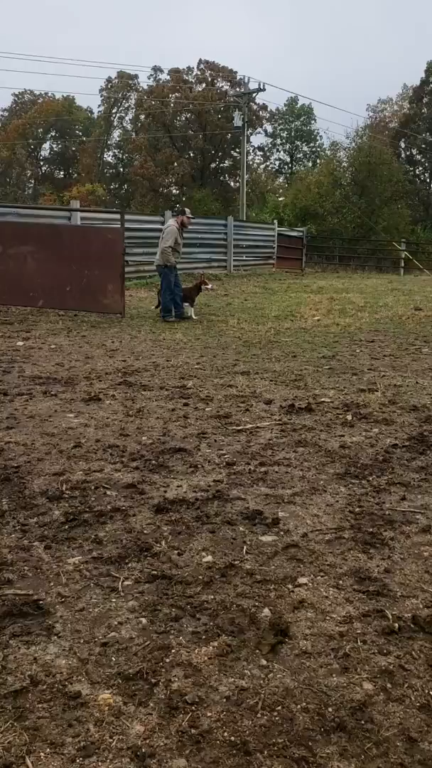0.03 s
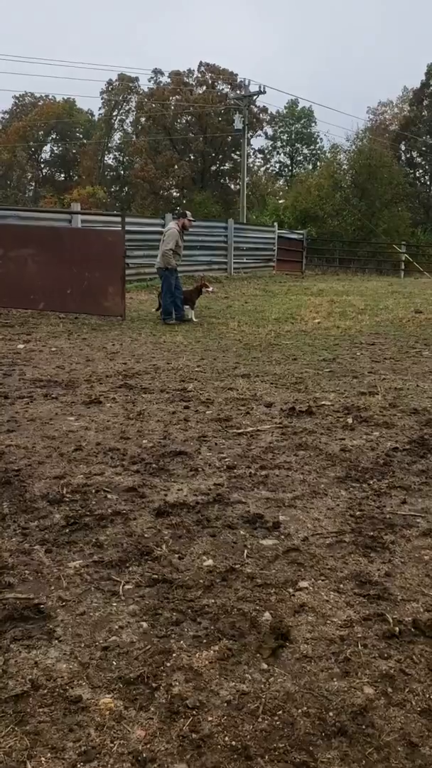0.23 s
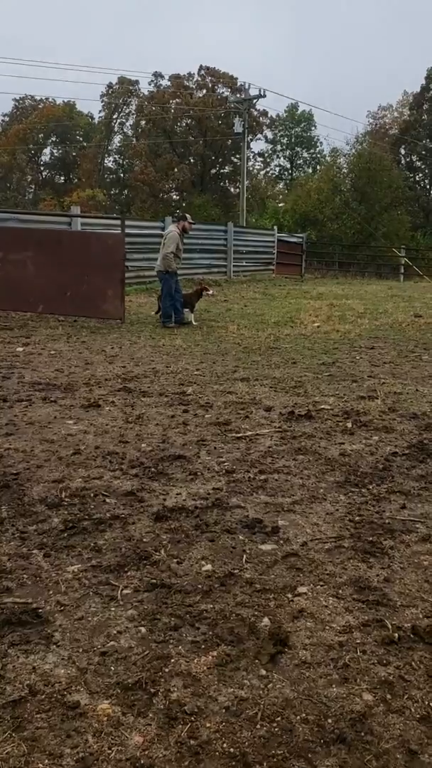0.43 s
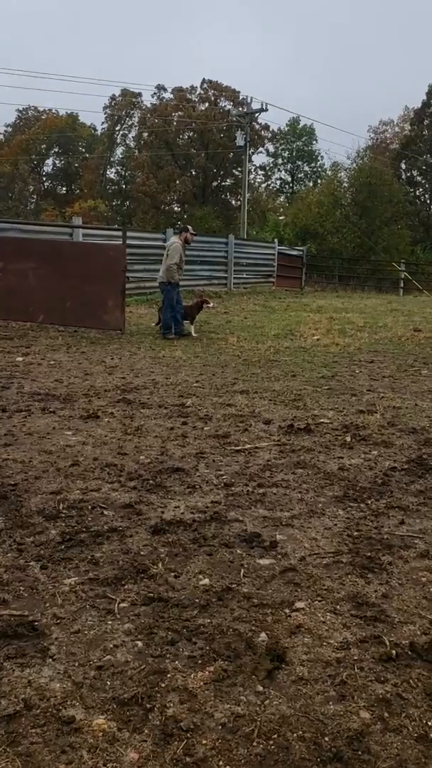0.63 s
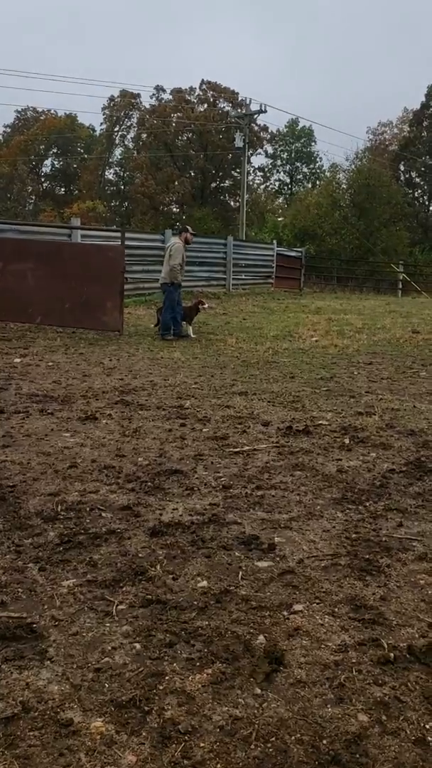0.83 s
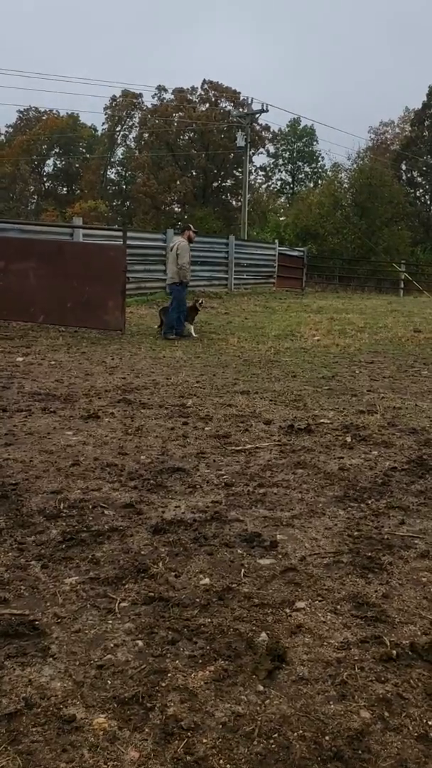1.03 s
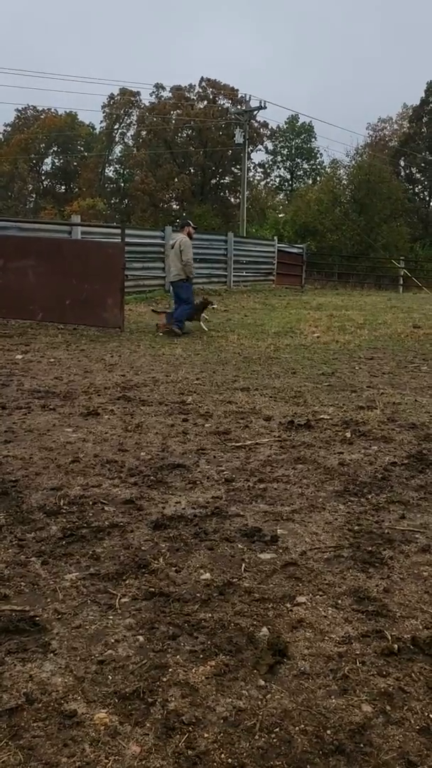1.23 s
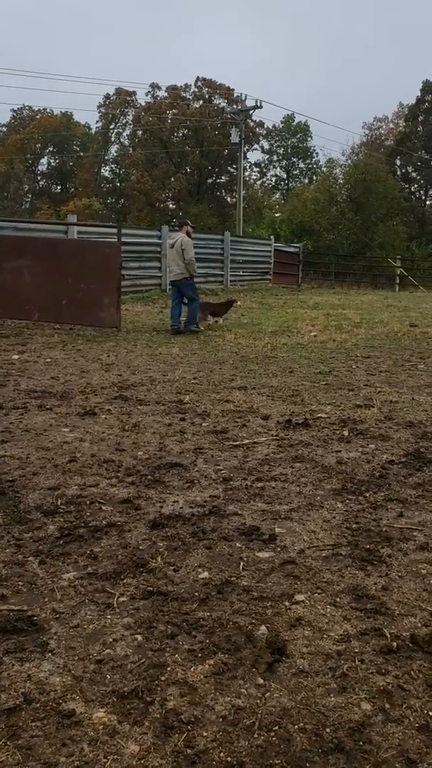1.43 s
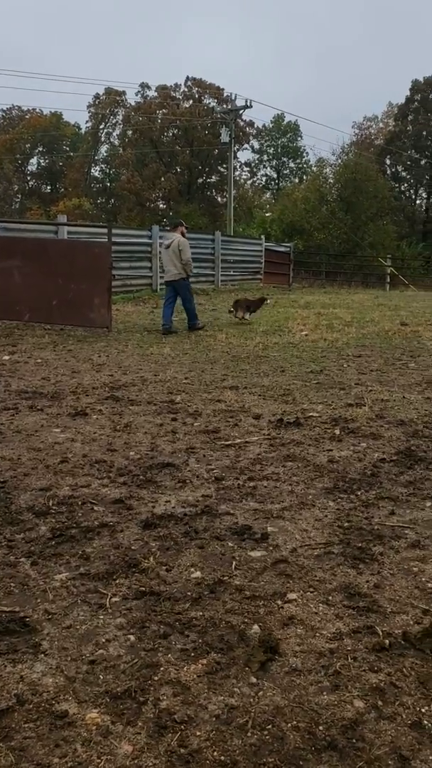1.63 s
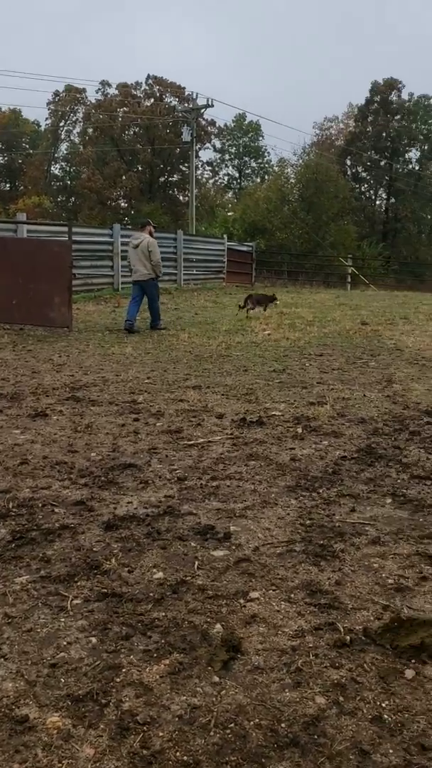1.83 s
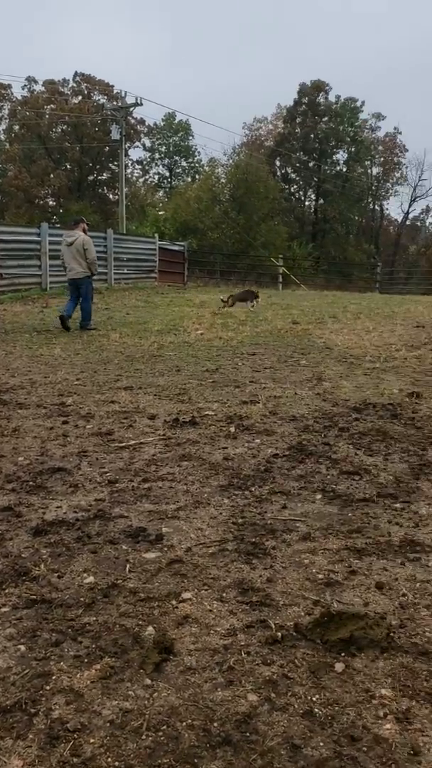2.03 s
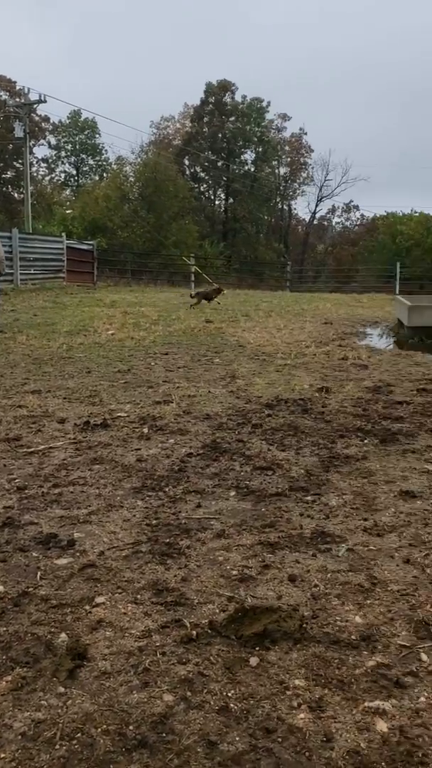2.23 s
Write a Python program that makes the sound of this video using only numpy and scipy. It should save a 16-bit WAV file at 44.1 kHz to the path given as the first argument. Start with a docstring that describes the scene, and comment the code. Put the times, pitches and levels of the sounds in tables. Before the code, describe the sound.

One cow moos outdoors in a farmyard, climbing from a muffled hum to a strained, nasal call before falling away. Beneath it are a faint echo, soft boot scuffs on dirt and a light wind rumble on the microphone.

```python
"""A cow on a farm lot hums low with its mouth shut, swells into one open, rising moo and drops it
with a rasp. Its vocal pulses ring in throat and nose, roughened by breath and brassy at full strain.
Fences and trees answer faintly. Insects hiss far off, a boot scuffs the dirt,
and light wind and a rustling sleeve touch the two microphone ports."""
import sys
import numpy as np
from scipy import signal
from scipy.fft import rfft, irfft, next_fast_len
from scipy.io import wavfile
from scipy.ndimage import map_coordinates

SR = 44100
rng = np.random.default_rng(int(sys.argv[2]) if len(sys.argv) > 2 else 0)


def unload_audio(sound):
    """Save the sound as a 16-bit wav file, at the path given as the first command line argument."""
    columns = np.transpose(np.atleast_2d(sound))
    # keep every value between -1 and 1, then stretch to whole-number steps
    steps = np.round(np.clip(columns, -1, 1) * 32767)
    wavfile.write(sys.argv[1], SR, steps.astype(np.int16))


N = 100856


def amp(db):
    return 10 ** (np.asarray(db) / 20)


def unit_rms(x):
    return x / np.sqrt(np.mean(x ** 2) + 1e-20)


def clock():
    return np.arange(N) / SR


def along(points, hz):
    """Read a curve at hz on a log frequency axis."""
    knots_hz, values = np.transpose(points)
    return np.interp(np.log(hz + 1), np.log(knots_hz + 1), values)


def automation(rows):
    """One lane, a value per sample, for each column after the time."""
    times, *lanes = np.transpose(rows)
    return [np.interp(clock(), times, lane) for lane in lanes]


def gate(start_s, end_s, fade_s):
    """On between two times, with soft edges."""
    return np.clip((clock() - start_s) / fade_s, 0, 1) * np.clip((end_s - clock()) / fade_s, 0, 1)


def wobble(per_s):
    """A smooth random curve with per_s knots a second."""
    return map_coordinates(rng.standard_normal(N // 20), [clock() * per_s], mode="wrap")


def filtered(x, response):
    """Apply a complex frequency response."""
    size = next_fast_len(N + SR // 2)
    return irfft(rfft(x, size) * response(np.fft.rfftfreq(size, 1 / SR)), size)[..., :N]


def noise(eq):
    """Coloured noise of rms 1."""
    return unit_rms(filtered(rng.standard_normal(N), lambda hz: amp(along(eq, hz))))


def stereo_noise(eq, shared, pan_db=0):
    """Noise partly shared by the two sides; positive pan_db leans left."""
    pair = np.sqrt(shared) * noise(eq) + np.sqrt(1 - shared) * np.array([noise(eq), noise(eq)])
    return pair * amp([[pan_db / 2], [-pan_db / 2]])


# Tone of the still air: freq_hz, gain_db
AIR_EQ = [(50, -1), (200, -9.5), (500, -26), (1000, -31), (3000, -36), (9000, -47.5), (15000, -30.5)]


def still_air():
    """A faint, wide bed of outdoor noise."""
    return amp(-73.5) * stereo_noise(AIR_EQ, shared=0.33, pan_db=-1.0)


# Band of the insect chorus: freq_hz, gain_db
INSECT_EQ = [(4500, -40.5), (5700, -2.5), (6800, 2), (7500, -2.5), (8400, -43)]


def insects(swell_db_per_s=5.5):
    """A far chorus blurs into a high hiss that creeps up on the left."""
    return amp(-90.5 + swell_db_per_s * clock()) * stereo_noise(INSECT_EQ, shared=0.18, pan_db=6.5)


# Ride of the gusts, before the trim: time_s, level_db
GUSTS = [(0.1, -68.5), (0.34, -66), (0.84, -70), (0.85, -63.5), (1.23, -71.5), (1.26, -59), (1.46, -81.5),
         (1.52, -54.5), (1.6, -69.5), (1.86, -63), (1.91, -57), (2.12, -53), (2.22, -65.5), (2.29, -47.5)]
# Tone of the wind rumble: freq_hz, gain_db
RUMBLE_EQ = [(12, -23.5), (28, -9.5), (60, 0.5), (100, -7), (160, -11.5), (300, -39), (1000, -58.5)]


def wind(trim_db=3):
    """Light gusts buffet the microphone ports in low lumps."""
    return amp(automation(GUSTS)[0] + trim_db) * stereo_noise(RUMBLE_EQ, shared=.25, pan_db=-2)


# Tone of the cloth: freq_hz, gain_db
CLOTH_EQ = [(5000, -28), (9000, -24.5), (11000, -8), (15500, -8)]


def sleeve_rustle():
    """Cloth brushes unevenly by the right port."""
    envelope = amp(-83 + 1.5 * wobble(8.5)) * gate(1.17, 2.1, .04)
    return envelope * stereo_noise(CLOTH_EQ, shared=.2, pan_db=-18)


# Ticks of the sleeve: start_s, level_db
TICK_HITS = [(1.196, -72.5), (2.016, -66.5)]
# Modes that ring in a tick: freq_hz, gain_db
TICK_RING = [(12000, 0.0027), (13300, 0.026)]


def sleeve_ticks(t60_s=.05):
    """The sleeve ticks on the right with a thin, unsteady ring that dies fast."""
    t = clock()
    ring = sum(amp(db) * np.sin(2 * np.pi * hz * t + 1.5 * wobble(900)) for hz, db in TICK_RING)
    decays = sum(amp(db - 60 * np.abs(t - start) / t60_s) * (t > start) for start, db in TICK_HITS)
    return ring * decays * amp([[-4], [2]])


# Strokes of the boot: peak_s, half_width_s, level_db
BOOT_STROKES = [(0.84, 0.11, -69.5), (2.29, 0.13, -64)]
# Tone of the dirt: freq_hz, gain_db
DIRT_EQ = [(100, 8.5), (400, -0.5), (1000, -9.5), (2800, -9), (4000, -23), (7000, -15), (9500, -22),
           (14000, -17.5)]


def boot_scuffs():
    """A sole drags over dirt in soft swells of gritty noise."""
    strokes = sum(amp(db) * np.exp(-((clock() - peak) / width) ** 2) for peak, width, db in BOOT_STROKES)
    grit = amp(2.4 * wobble(250))
    return strokes * grit * stereo_noise(DIRT_EQ, shared=0.15, pan_db=-8.5)


# Stereo placement of the call: freq_hz, left_minus_right_db
CALL_PAN = [(100, 0), (175, 4.5), (350, -3.5), (530, -3.5), (750, 5), (1290, 1), (1900, 0.4), (2500, -0.5),
            (4400, 7.5), (8000, -1.5), (15000, -15)]
# Slapback echoes off the fences, the latest from the far tree line, before the return EQ: delay_s, gain_db
SLAPBACKS = [(0.073, -21.5), (0.131, -25.5), (0.251, -25.5), (0.361, -27.5)]
# Reverb decay among the trees: freq_hz, t60_s
TREE_DECAY = [(150, .7), (900, 1.3), (2000, .7), (8000, .5)]
# Tone of all that comes back: freq_hz, gain_db
RETURN_EQ = [(170, 3.5), (330, 1.5), (520, -2), (700, 4.5), (880, 5), (1250, 4.5), (1900, -2.5),
             (4000, 3.5)]


def yard(voice, right_lag_s=0.00012, tree_send_db=-19):
    """The call arrives from the left, then from the fences and, diffusely, from the trees."""
    def placement(hz):
        sides = np.array([[.5], [-.5]])
        return amp(along(CALL_PAN, hz) * sides) * np.exp(2j * np.pi * hz * right_lag_s * sides)

    def fences(hz):
        return sum(amp(db) * np.exp(-2j * np.pi * hz * delay) for delay, db in SLAPBACKS)

    direct = filtered(voice, placement)
    bands_hz, t, grains = signal.stft(rng.standard_normal((2, SR)), SR, nperseg=256)
    decay = amp(-60 * t / along(TREE_DECAY, bands_hz)[:, None])
    tail = signal.istft(grains * decay, SR, nperseg=256)[1]
    mid, side = signal.fftconvolve(voice, tail / np.linalg.norm(tail[0]), axes=1)[:, :N]
    side = filtered(side, lambda hz: hz / (hz + 1500))  # keeps the bass of the tail centred
    echoes = filtered(direct, fences) + amp(tree_send_db) * np.array([mid + side, mid - side])
    return direct + filtered(echoes, lambda hz: amp(along(RETURN_EQ, hz)))


def throat_pulses(eq, pitch, phase, smear_rad, stop_harmonic=40):
    """Harmonics from the fourth up ring in a throat shape, smeared by the distance; rms about 1."""
    hz = np.fft.rfftfreq(8192, 1 / SR)
    shape = amp(along(eq, hz))
    cepstrum = irfft(np.log(shape))
    minimum_phase = rfft(2 * cepstrum[:len(hz) - 1], len(cepstrum)).imag
    shape = shape * (hz < eq[-1][0])
    wave, power = 0, 1e-12
    for k in range(4, stop_harmonic):
        gain = np.interp(k * pitch, hz, shape)
        shift = np.interp(k * pitch, hz, minimum_phase) + smear_rad * rng.normal()
        wave = wave + gain * np.sin(k * phase + shift)
        power = power + gain ** 2 / 2
    return wave / np.sqrt(power)


def puffs(phase, depth=0.2):
    """The airflow pulses once per vocal cycle."""
    return unit_rms(np.exp(depth * np.cos(phase - 1)))


def roughen(clean, air, rough, breath_db=8.5):
    """Trade clean tone for breath as the roughness rises."""
    return np.sqrt(1 - rough ** 2) * clean + amp(breath_db) * rough * air


# Air through the open mouth, easing at full strain: time_s, level_db
BREATH_RIDE = [(.93, -104), (1.04, -78), (1.22, -70), (1.8, -69.5), (1.9, -73), (2.03, -70), (2.14, -82)]
# Tone of the breath: freq_hz, gain_db
BREATH_EQ = [(1500, -47), (3000, -8), (3900, -13), (5100, -3), (6200, -10), (7400, -15), (8500, -26.5),
             (11000, -30.5), (16000, -38.5)]


def breath(phase):
    """Air hisses out of the mouth in time with the vocal pulses."""
    return amp(automation(BREATH_RIDE)[0]) * puffs(phase) * stereo_noise(BREATH_EQ, shared=0.33)


# Brassy edge of the voice: freq_hz, gain_db
BRASS_EQ = [(2500, -40), (2950, -2), (3250, -20), (3750, -7), (4000, -12), (4200, 0), (4700, -4),
            (4900, -18), (5230, 4), (5550, -12), (5750, -2), (6100, -22)]


def brassy_flare(pitch, peak_s=1.955, half_width_s=.1):
    """At full strain, clean high overtones flare up."""
    strain = np.exp(-((clock() - peak_s) / half_width_s) ** 4)
    steady_phase = 2 * np.pi * np.cumsum(pitch) / SR
    return amp(-63) * strain * throat_pulses(BRASS_EQ, pitch, steady_phase, smear_rad=.8)


# Sharp nasal peak as the call swells and as it closes: time_s, centre_hz, level_db
TWANG_SWEEP = [(0.941, 2099, -84), (0.999, 2070, -71.5), (1.049, 2040, -62), (1.108, 1952, -50),
               (1.168, 1924, -56), (1.23, 1894, -65), (1.321, 1917, -90), (1.983, 1864, -89),
               (2.04, 1836, -54), (2.078, 1854, -57), (2.11, 1870, -87.5)]


def nasal_twang(pitch, phase, width_hz=120):
    """The pulses ring one narrow nasal resonance that stands out as the call swells and as it closes."""
    centre_hz, level_db = automation(TWANG_SWEEP)
    harmonics = np.arange(9, 25)[:, None]
    gains = (1 + 2j * (harmonics * pitch - centre_hz) / width_hz) ** -2
    waves = (gains * np.exp(1j * harmonics * phase)).real
    clean = waves.sum(0) / np.sqrt((np.abs(gains) ** 2).sum(0) / 2)
    carrier = 2 * np.pi * np.cumsum(centre_hz) / SR
    air = wobble(width_hz) * np.cos(carrier) + wobble(width_hz) * np.sin(carrier)
    return amp(level_db) * (clean + .3 * air) * gate(TWANG_SWEEP[0][0], TWANG_SWEEP[-1][0], 0.023)


# Throat and nose with the mouth shut: freq_hz, gain_db
HUM_EQ = [(250, -7), (320, 5.5), (400, -13.5), (540, -0.5), (630, -11), (720, -8), (870, -38),
          (1250, -16.5), (1520, -8.5), (1800, -49), (2450, -10.5), (2800, -17), (4000, -36.5)]


def shut_mouth_hum(pitch, phase, swell_db_per_s=16):
    """Muffled overtones swell, then give way to the open moo."""
    envelope = amp(-91.5 + swell_db_per_s * clock()) * gate(-1, 1.6, 0.027)
    return envelope * throat_pulses(HUM_EQ, pitch, phase, smear_rad=.8)


# Nasal formants of the open call: freq_hz, gain_db
NASAL_EQ = [(1000, -52), (1600, -21.5), (1760, -3.5), (1920, 3), (2120, -10.5), (2290, -16), (2500, -3.5),
            (2620, -12), (2780, -25.5), (2950, -15), (3200, -27), (3450, -37), (3700, -22.5), (4000, -63.5)]


def nasal_rasp(pitch, phase, rough):
    """Clean pulses and rough puffs of air ring in the same nasal formants."""
    air = puffs(phase) * noise(NASAL_EQ)
    clean = throat_pulses(NASAL_EQ, pitch, phase, smear_rad=.7, stop_harmonic=28)
    return roughen(clean, air, rough)


# Vowel shape that dominates with the mouth half open: freq_hz, gain_db
HALF_OPEN_EQ = [(400, 3), (600, 0.5), (700, 0), (1100, -4), (1240, -1), (1560, -1), (1720, -0.5),
                (1900, -40), (3000, -81)]
# Vowel shape that comes in as the mouth opens wide: freq_hz, gain_db
WIDE_OPEN_EQ = [(450, 6), (690, -8.5), (870, -1.5), (1050, 0), (1210, 0.5), (1390, -2.5), (1560, -1.5),
                (1720, -10.5), (1900, -29.5), (3000, -80)]


def mouth_vowel(pitch, phase, rough, half_open_s=1, wide_open_s=1.58):
    """The overtones below the nasal ring change vowel as the mouth opens."""
    mouth = np.interp(clock(), [half_open_s, wide_open_s], [0, 1])
    harmonics = np.arange(4, 16)[:, None]
    hz = harmonics * pitch
    drift_db = 1.8 * np.array([wobble(6) for _ in harmonics])  # each swells and dips on its own
    gains = amp((2.5 - mouth) * along(HALF_OPEN_EQ, hz) + mouth * along(WIDE_OPEN_EQ, hz) + drift_db)
    smear_rad = (1 - mouth) * .25 + mouth * .7  # the first pulses are the sharpest
    waves = gains * np.sin(harmonics * (phase - 1) + smear_rad * rng.standard_normal(harmonics.shape))
    clean = waves.sum(0) / np.sqrt((gains ** 2).sum(0) / 2)
    return roughen(clean, noise(HALF_OPEN_EQ), rough)


# Melody and low body of the moo: time_s, pitch_hz, partial1_db, partial2_db, partial3_db
MOO = [(0.1, 75.58, -66, -86, -83.5), (0.35, 77.98, -69.5, -76, -85), (0.6, 81.64, -68, -73, -86),
       (0.75, 83.83, -66, -80, -91), (0.85, 87.5, -65, -71.5, -88), (0.96, 90.64, -79.5, -85.5, -72),
       (1.0, 95.77, -61.5, -60.5, -79), (1.05, 107.1, -65.5, -57, -53), (1.09, 115.7, -58, -55.5, -57.5),
       (1.13, 124.2, -54, -47, -77), (1.18, 138.7, -45, -50, -58.5), (1.235, 149, -40.5, -49.5, -70),
       (1.27, 152, -62.5, -48.5, -55.5), (1.3, 155.9, -46.5, -47, -57.5), (1.35, 158.9, -41, -49, -47.5),
       (1.39, 163.4, -49, -45, -44.5), (1.43, 168.3, -42.5, -50, -43.5), (1.49, 171.1, -39, -55, -43),
       (1.54, 172.7, -40, -51, -48), (1.6, 174.3, -40.5, -46, -42.5), (1.68, 175.7, -41, -46.5, -41),
       (1.76, 176.5, -45, -48.5, -43.5), (1.84, 175.9, -45, -47, -43.5), (1.92, 174, -40.5, -41, -40),
       (1.98, 170, -41, -48, -43), (2.02, 166.5, -37.5, -44, -39), (2.05, 153.8, -50, -39, -51),
       (2.08, 130.7, -46, -44.5, -61), (2.12, 117.4, -45.5, -49.5, -68), (2.15, 112.7, -48.5, -70.5, -82)]
# Faders of the open-mouth overtones: time_s, vowel_db, nasal_db
OVERTONE_RIDE = [(.93,-97,-83), (1.03,-66,-67), (1.12,-59,-62.5), (1.22,-56.5,-56.5), (1.33,-56,-51),
                 (1.52,-53,-53), (1.62,-54,-49.5), (1.84,-51.5,-46), (1.9,-50.5,-44.5), (1.96,-47,-45.5),
                 (2.02,-50.5,-44), (2.06,-54.5,-51.5), (2.1,-59,-68.5), (2.14,-77,-81)]
# Rasp in the voice: time_s, roughness_0_to_1
ROUGHNESS = [(.95, .15), (1.12, .25), (1.25, .17), (1.45, .1), (1.85, .1), (2.0, .06), (2.05, .24),
             (2.12, .35)]


def cow(open_s=0.936, end_s=2.15, fade_s=0.015):
    """Vocal pulses give three strong low partials and overtones in throat and nose."""
    pitch, *partials_db = automation(MOO)
    vowel_db, nasal_db = automation(OVERTONE_RIDE)
    rough = automation(ROUGHNESS)[0]
    jitter = 1 + .011 * rough * wobble(110)
    phase = 2 * np.pi * np.cumsum(pitch * jitter) / SR
    body = sum(np.sqrt(2) * amp(db) * np.sin(k * phase) for k, db in enumerate(partials_db, 1))
    vowel = amp(vowel_db) * mouth_vowel(pitch, phase, rough)
    nasal = amp(nasal_db) * nasal_rasp(pitch, phase, rough)
    opened = gate(open_s, end_s, fade_s)
    voiced = body * gate(-1, end_s, fade_s) + shut_mouth_hum(pitch, phase) + opened * (vowel + nasal)
    hiss = opened * breath(phase)
    shimmer = amp(2.5 * rough * wobble(60))
    return voiced * shimmer + hiss + nasal_twang(pitch, phase) + brassy_flare(pitch)


def scene():
    """The cow in its yard, over the ambience and small movements."""
    call = yard(cow())
    ambience = wind() + insects() + still_air()
    return call + ambience + boot_scuffs() + sleeve_rustle() + sleeve_ticks()


def record(dry, start_s=0.067, top_hz=15750):
    """A snap fade-in after a moment of silence, then a brick-wall high cut."""
    fade_in = np.clip((clock() - start_s) / 0.0013, 0, 1)
    return filtered(dry * fade_in, lambda hz: hz < top_hz)


dry = scene()
out = record(dry)
unload_audio(out)
```